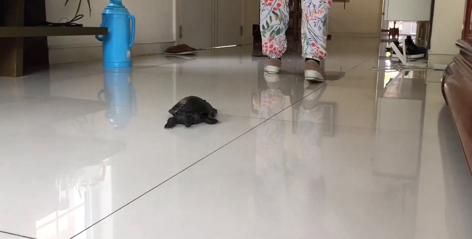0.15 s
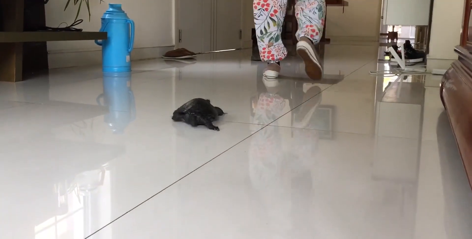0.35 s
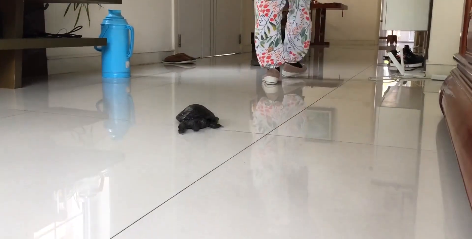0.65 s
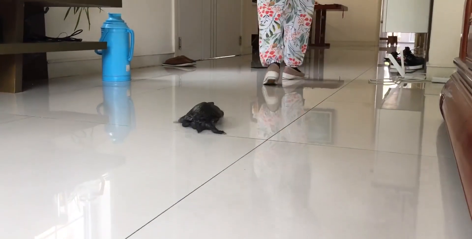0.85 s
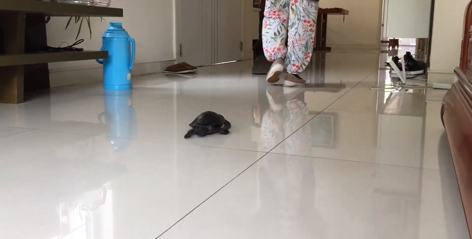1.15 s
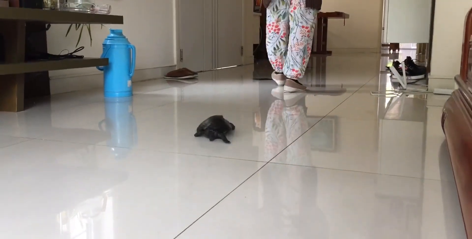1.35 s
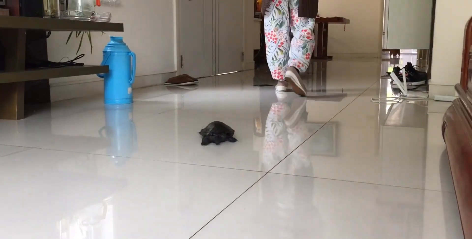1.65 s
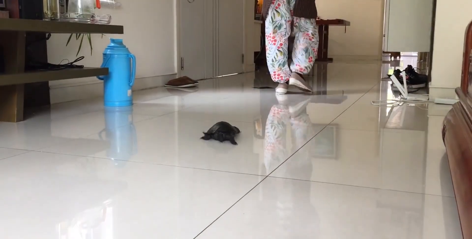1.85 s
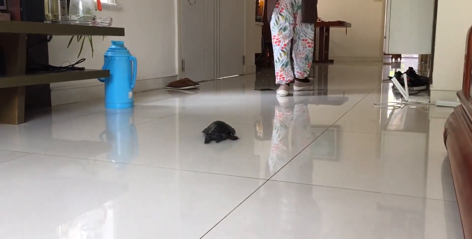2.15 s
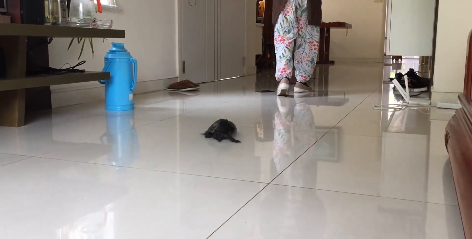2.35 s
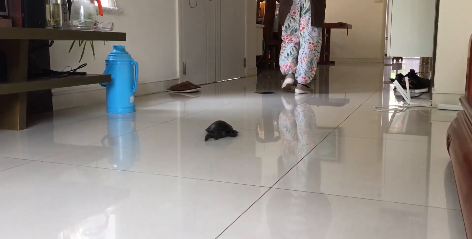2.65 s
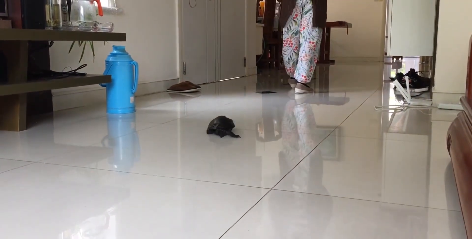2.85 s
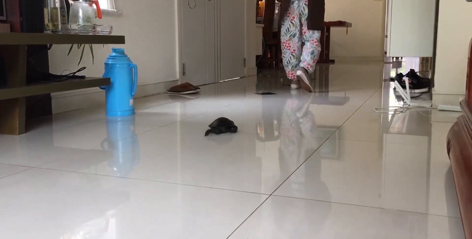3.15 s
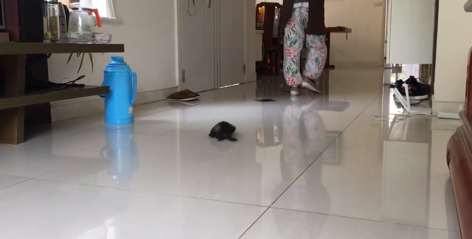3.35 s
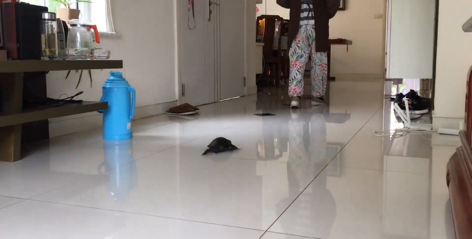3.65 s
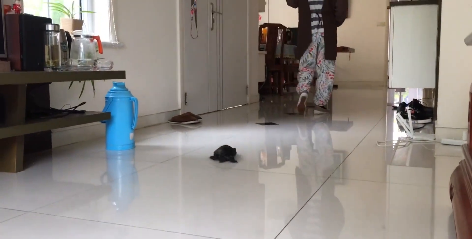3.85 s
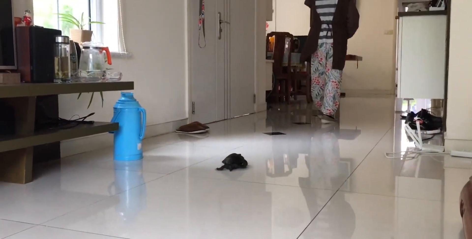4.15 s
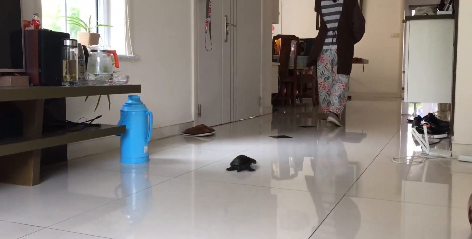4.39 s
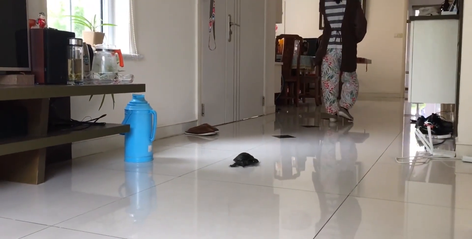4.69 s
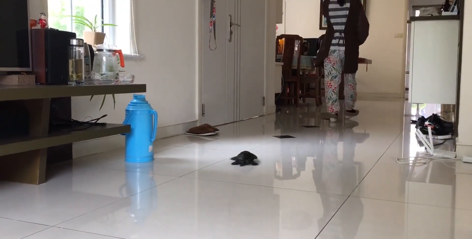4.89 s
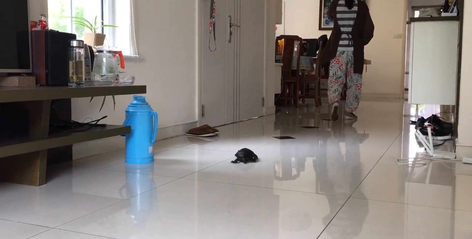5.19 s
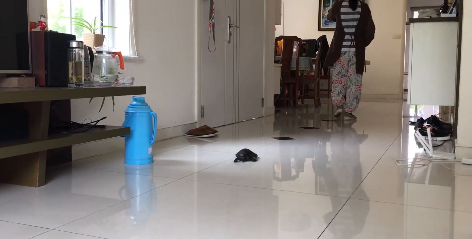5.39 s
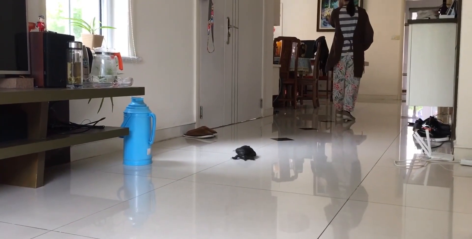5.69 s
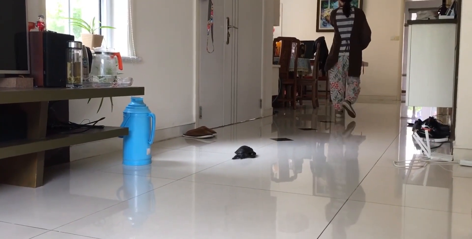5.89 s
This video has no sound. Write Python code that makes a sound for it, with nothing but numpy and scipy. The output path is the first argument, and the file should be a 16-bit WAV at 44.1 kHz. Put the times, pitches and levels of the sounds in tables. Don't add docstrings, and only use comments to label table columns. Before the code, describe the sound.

Someone in stiff-soled slippers walks away over hard indoor tile, each slap cracking and ringing briefly, amid soft trouser swishes and quiet hiss.

```python
import sys
import numpy as np
from scipy import signal
from scipy.io import wavfile
from scipy.ndimage import uniform_filter1d

SR = 44100
rng = np.random.default_rng(int(sys.argv[2]) if len(sys.argv) > 2 else 0)


def linear_from_db(decibels):
    return 10 ** (np.asarray(decibels, float) / 20)


def dump_mix(stems):
    frames = np.atleast_2d(stems).T
    limited = np.clip(frames, -1, 1)
    pcm = np.round(limited * 32767).astype(np.int16)
    wavfile.write(sys.argv[1], SR, pcm)


N = 265863

# t/s, crack level/dB, treble level/dB, hall share/dB, f/Hz
SLAP_EDGES = [(0.1827, -43.5, -53, 4, 2900), (0.594, -22, -29, -9, 2900), (1.1007, -26.5, -35.5, -7, 2820),
              (2.037, -13, -31, -17.5, 3210), (2.0414, -13, -27, -10.5, 2400),
              (2.153, -25.5, -34, -9.5, 3140), (2.588, -19.5, -30, -9, 2990),
              (2.7555, -28.5, -41.5, -8, 2690), (2.8121, -13, -23.5, -14, 3170),
              (3.314, -23, -30, -8.5, 2880), (4.8698, -43.5, -51.5, 6, 2650),
              (5.1794, -12.5, -26, -5, 2770), (5.692, -43, -42.5, -8, 2500)]
# t/s, crack level/dB, treble level/dB, hall share/dB, f/Hz
TAP_EDGES = [(0.015, -34.5, -45.5, -13.5, 2960), (0.0746, -32, -45.5, -10.5, 3100),
             (0.52, -28, -37.5, -12, 2780), (0.9433, -49, -65, -14, 3050), (1.0721, -42.5, -44, -5, 2860),
             (1.5349, -32, -44.5, -11, 2640), (2.0143, -30.5, -38, -9, 2850),
             (3.0733, -31, -41.5, -9.5, 2590), (3.2955, -34.5, -49, -10, 2740),
             (3.6022, -35.5, -42, -2.5, 2690), (3.696, -43, -64, -7, 3020), (3.7955, -34, -53, -27, 2780),
             (3.8121, -38, -46.5, -3.5, 2600), (3.8934, -33, -47.5, -11, 2800),
             (4.0898, -43.5, -69, -11.5, 2700), (4.152, -53, -64, -0.5, 2860), (4.3905, -47, -58, -9, 2660),
             (4.6886, -42, -44, -1.5, 2900)]


def band(x, lo_hz, hi_hz):
    sos = signal.butter(2, [lo_hz, min(hi_hz, 0.45 * SR)], "bandpass", fs=SR, output="sos")
    return signal.sosfilt(sos, x)


def ring(hz, t60, rise, length=0.08, drop=0.0, drop_s=0.002):
    t = np.arange(int(length * SR)) / SR
    turns = hz * (t + drop * drop_s * (1 - np.exp(-t / drop_s)))
    return np.sin(2 * np.pi * turns) * (1 - np.exp(-t / rise)) * np.exp(-np.log(1000) * t / t60)


def wavelet(hz, half_cycles, t):
    cycles = hz * (t - 0.0007)
    return np.sin(2 * np.pi * cycles * (1 - 0.084 * cycles)) * np.exp(-(cycles / half_cycles) ** 2 / 2)


def add(out, s, sound):
    i = int(s * SR)
    out[..., i:i + sound.shape[-1]] += sound[..., :max(N - i, 0)]


def walk(rate):
    k = int(SR / rate)
    held = np.repeat(rng.standard_normal(N // k + 1), k)
    return uniform_filter1d(uniform_filter1d(held, k), k)[:N]


def swish_db():
    # t of the peak/s, level/dB
    swishes = [(0.01, 3.5), (0.3, 1.5), (0.63, 4), (1.12, 3.5), (1.27, 2.5), (1.7, 4), (2.6, 4.5),
               (3.102, 2), (3.8, 1.5), (5.34, 0.5)]
    t = np.arange(N) / SR
    rise_s, fall_s = 0.21, 0.19
    return sum(db * np.exp(-((t - s) / np.where(t < s, rise_s, fall_s)) ** 2) for s, db in swishes)


def house():
    # f/Hz, level/dB per Hz
    spectrum = [(15, -37), (25, -3), (71, 10), (124, 4), (455, -20), (520, -4.5), (840, -16), (1190, -11),
                (1920, -19.5), (2640, -14), (4870, -20.5), (6350, -22), (10500, -23), (13400, -29),
                (14500, -41)]
    out, swell, rustle = np.zeros(N), walk(0.24), walk(36)
    hz_of, db_of = np.transpose(spectrum)
    treble_db = swish_db() - 3.5 + rustle
    for hz in 25 * 2 ** (np.arange(28) / 3):
        db = np.interp(np.log(hz), np.log(hz_of), db_of) + 1.6 * swell + 0.3 * walk(3.3)
        noise = band(rng.standard_normal(N), hz / 2 ** (1 / 6), hz * 2 ** (1 / 6))
        out += linear_from_db(db + min(hz / 3000, 1) * treble_db) * noise
    return out * linear_from_db(-59.5) / np.sqrt(np.mean(out ** 2))


def grit():
    # t/s, level/dB
    loose = [(0.054, -39), (0.2334, -46), (0.4449, -46.5), (0.5611, -45), (0.669, -59), (1.053, -42),
             (1.596, -42), (1.7613, -46), (1.848, -46), (2.5517, -43), (3.5423, -66), (3.568, -47),
             (4.0767, -49), (4.128, -48), (4.422, -51.5), (4.671, -48), (5.3926, -56), (5.4774, -48),
             (5.4955, -53), (5.552, -49.5), (5.9643, -50)]
    out = np.zeros(N)
    t = np.arange(int(0.03 * SR)) / SR
    crushed = [(s, treble_db - 6) for s, _, treble_db, *_ in SLAP_EDGES + TAP_EDGES]
    for s, db in loose + crushed:
        add(out, s + 0.00071, linear_from_db(db - 9) * rng.standard_normal(len(t)) * np.exp(-t / 0.003))
    return band(out, 2700, 22000)


def squeaks():
    # t/s, length/s, start f/Hz, end f/Hz, level/dB
    drags = [
        (0.531, 0.22, 500, 640, -70),
        (1.415, 0.064, 1130, 1160, -75),
        (1.597, 0.019, 1695, 1613, -50),
        (1.613, 0.084, 1640, 1675, -65),
        (1.747, 0.096, 2610, 2730, -68),
        (1.847, 0.114, 3090, 3140, -69),
        (4.99, 0.061, 740, 765, -74),
        (5.087, 0.093, 748, 777, -64.5),
    ]
    out = np.zeros(N)
    for s, length, start_hz, end_hz, db in drags:
        t = np.arange(int(length * SR)) / SR
        grip = uniform_filter1d(rng.standard_normal(N // 20)[:len(t)], int(0.00236 * SR))
        tone = np.sin(2 * np.pi * np.cumsum(np.linspace(start_hz, end_hz, len(t))) / SR)
        add(out, s, linear_from_db(db) * tone * grip / grip.std() * np.sin(np.pi * t / length) ** 0.5)
    return out


def hall(sent):
    # f/Hz, level near/dB, level midway/dB, level far/dB, t60/s
    standing = [(94.4, 2.5, 1, 5, 0.97), (143.4, 9, -8.5, -3, 0.57), (168.9, -13, 4.5, -7, 0.5),
                (352.3, -5, -8, 6.5, 0.52), (250, 15, -5, 0, 0.48), (291.7, 11.5, 1.5, -2.5, 0.43),
                (400.3, -6.5, -15.5, 3.5, 0.64), (426, -59, -0.5, 11.5, 0.31), (474, -30, 0.5, -7.5, 0.41),
                (528.3, 9, 3.5, 11.5, 0.14), (614.6, 4, 3.5, -25, 0.48), (693, 10, 15, -20, 0.15),
                (889, -27, 5, -21, 0.37), (1005, -66, 17, -21, 0.38)]
    # f/Hz, t60/s, level/dB
    tail_bands = [(116, 0.31, -3.5), (250, 0.63, -11.5), (500, 0.45, -4.5), (1037, 0.51, 4),
                  (1860, 0.76, -3.5), (4670, 0.58, 10.5), (7160, 0.2, -4), (13500, 0.45, 4)]
    # delay/s, level/dB
    echoes = [(.0059, -15), (0.013, -21.5), (0.0195, -18), (0.028, -6.5)]
    t = np.arange(int(0.75 * SR)) / SR
    out, spots = np.zeros(N), 6

    def noise():
        return rng.standard_normal((len(sent), len(t)))

    for k in range(spots):
        tail = 0
        for hz, t60, db in tail_bands:
            octave = band(noise(), hz / np.sqrt(2), hz * np.sqrt(2)) * np.sqrt(SR / hz / 8)
            tail = tail + linear_from_db(db - 60 * t / t60) * octave
        answer = linear_from_db(-27) * tail * (1 - np.exp(-t / 0.0009))
        answer += linear_from_db(-19 - 60 * t / 0.19) * band(noise(), 133, 9000) * (t > 0.003)
        clumps_db = 1.8 * np.repeat(noise()[:, ::128], 128, axis=1)[:, :len(t)]
        answer *= linear_from_db(clumps_db)
        far = 2 * k / (spots - 1)
        for hz, *dbs, t60 in standing:
            wave = ring(hz, t60, 0.003, length=len(t) / SR + 1e-6)[:len(t)]
            answer += linear_from_db(-41.5 + np.interp(far, [0, 1, 2], dbs) + rng.standard_normal()) * wave
        for lag, db in echoes:
            answer[:, int(lag * (1 + 0.04 * rng.standard_normal()) * SR)] += linear_from_db(db)
        here = slice(k * N // spots, (k + 1) * N // spots)
        add(out, here.start / SR, signal.fftconvolve(sent[:, here], answer, axes=1).sum(axis=0))
    return out


def cracks():
    out = np.zeros((3, N))
    t = np.arange(int(0.08 * SR)) / SR
    tick = band(t == 0, 3700, 12700)
    rows = [(*row, 0.5, 0.84) for row in SLAP_EDGES] + [(*row, 0.92, 0.92) for row in TAP_EDGES]
    for s, db, treble_db, wet_db, hz, hall_cycles, hall_pitch in sorted(rows):
        snap = 0.22 * wavelet(hz, 1.15, t)
        spread = 0.21 * wavelet(hall_pitch * hz, hall_cycles, t)
        spit = linear_from_db(-4.5) * band(rng.standard_normal(len(t)) * np.exp(-t / 0.0012), 3600, 6870)
        edge = linear_from_db(treble_db - db - 2)
        wet = linear_from_db(min(wet_db, 4))
        add(out, s + 0.00098, linear_from_db(db + 10.5) * np.array([snap + edge * spit, wet * spread, wet * edge * tick]))
    return out


def thumps():
    # t/s, thump level/dB, boom level re thump/dB, thump f/Hz, hall share/dB
    slaps = [(0.083, -27, 0, 396, -9.5), (0.185, -22, 0.5, 381, -11), (0.596, -23, 2.5, 417, -7.5),
             (1.101, -29, 4, 450, -5.5), (2.035, -27, -2.5, 250, 0), (2.154, -25.5, 2, 319, -8),
             (2.586, -22.5, -1, 327, -6), (2.756, -25, 3, 308, -7.5), (2.814, -22, -0.5, 422, -11),
             (3.315, -21, -8, 420, -5), (4.871, -38, -4, 466, 1), (5.178, -24, -14, 546, -10),
             (5.18, -26.5, -1.5, 667, -6), (5.693, -32.5, -0.5, 374, -3.5)]
    # t/s, thump level/dB, boom re thump/dB, squeezed air re thump/dB, thump f/Hz
    touches = [(0.016, -54, 12.5, 8.5, 393), (0.521, -47.5, 6.5, -2, 413), (0.565, -43, -11, -20, 500),
               (0.94, -57.5, 11.5, -6, 250), (1.191, -43, 13, -22, 260), (1.535, -54, 14.5, -10, 510),
               (1.582, -63.5, 18.5, 11, 250), (1.688, -50, 11, -10, 480), (2.014, -45, -48, -1, 250),
               (3.074, -46.5, 1.5, -12, 297), (3.296, -40.5, -31, -24, 292), (3.602, -39.5, -2.5, -2, 294),
               (3.698, -50, -5, -5, 470), (3.799, -42, -25, -25, 280), (3.812, -28.5, -4, -16, 392),
               (4.091, -43.5, -0.5, -9.5, 365), (4.388, -55.5, 7.5, -1, 296), (4.687, -46.5, 1, -0.5, 334),
               (5.453, -41, 5, -9, 437)]
    lands = []
    for s, db, boom_db, hz, wet_db in slaps:
        air_db = -3 + 3 * np.log2(hz / 400)
        lands.append((s, db, boom_db, air_db, hz, wet_db))
    for row in touches:
        lands.append((*row, -7 + 0.82 * row[0]))
    lands.sort()
    out = np.zeros((5, N))
    late = int(0.00092 * SR)
    chances = rng.standard_normal((len(lands), 2))
    for (s, db, boom_db, air_db, hz, wet_db), (air_chance, boom_chance) in zip(lands, chances):
        air = ring(1350 * (1 + 0.08 * air_chance), 0.0085, 0.002, drop=0.21, drop_s=0.00066)
        sole = ring(0.78 * hz, 0.023, 0.00045, drop=1.0, drop_s=0.0019)
        soft = 1 + 0.2 * max(boom_db - 9, 0)
        boom_hz = (140 + 9 * s) * (1 + 0.13 * boom_chance)
        boom = ring(boom_hz, 0.026 * soft, 0.0025 * soft, drop=0.42 / soft ** 2, drop_s=0.0057)
        boom *= np.hanning(2 * len(air))[len(air):] ** 0.4
        slab = ring(362, 0.0083, 0.001) + 0.5 * ring(550, 0.0013, 0.003)
        parts = np.array([linear_from_db(air_db + 5.5) * air,
                          -np.roll(sole, late),
                          -linear_from_db(boom_db) * np.roll(boom, late),
                          -linear_from_db(-4.5) * np.roll(slab, late)])
        puff = linear_from_db(air_db + 9) * ring(1383, 0.0019, 0.00032, drop=0.4, drop_s=0.00041)
        direct = linear_from_db(2.5) * parts.sum(axis=0)
        to_hall = linear_from_db(min(wet_db, 2)) * np.vstack([0.39 * parts[0] + puff, parts[1:]])
        add(out, s - 0.001, linear_from_db(db + 2) * np.vstack([direct, to_hall]))
    return out


def scene():
    heel, air, sole, boom, slab = thumps()
    edge, snap, tick = cracks()
    drag = squeaks()
    sent = np.array([air + tick + linear_from_db(-15) * drag, sole, boom + snap, slab])
    steps = heel + edge + drag + hall(sent)
    return (band(steps, 165, 19500) + grit() + house())[None]


def top_cut(x):
    return signal.sosfilt(signal.butter(12, 15600, fs=SR, output="sos"), x)


def record(dry):
    # f/Hz, width/Hz, level/dB
    port_dips = [(4950, 144, -13), (10540, 300, -25.5)]
    for hz, width_hz, db in port_dips:
        peak = signal.lfilter(*signal.iirpeak(hz, hz / width_hz, fs=SR), dry)
        dry = dry - (1 - linear_from_db(db)) * peak
    cut = signal.sosfilt(signal.ellip(16, 0.2, 55, 14230, fs=SR, output="sos"), dry)
    return top_cut(cut)


dry = scene()
out = record(dry)
dump_mix(out)
```